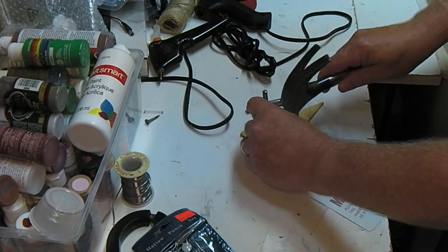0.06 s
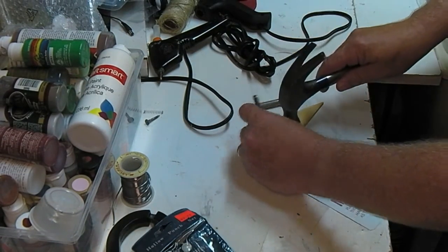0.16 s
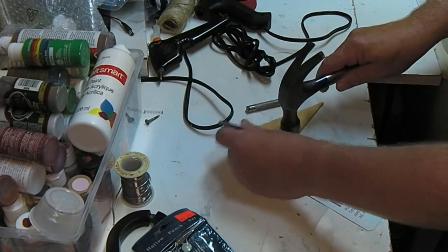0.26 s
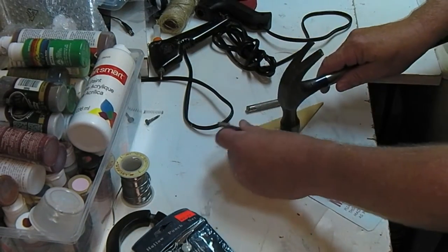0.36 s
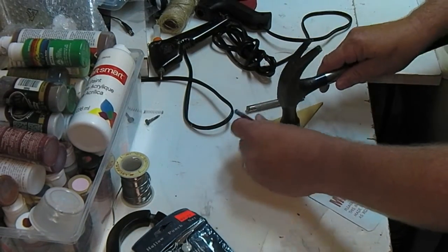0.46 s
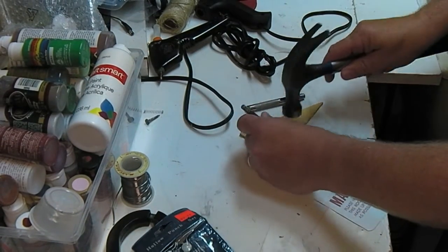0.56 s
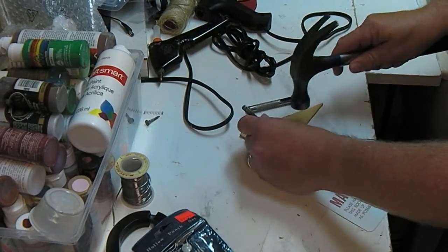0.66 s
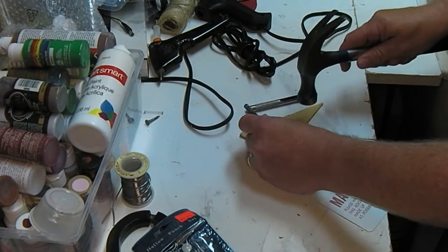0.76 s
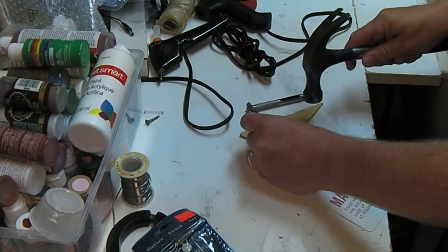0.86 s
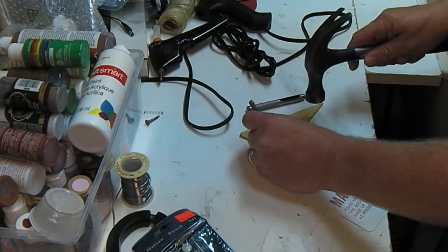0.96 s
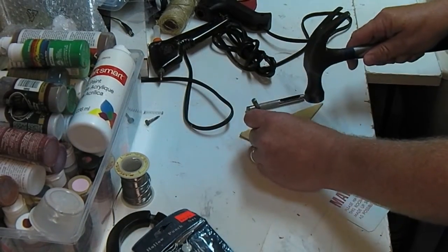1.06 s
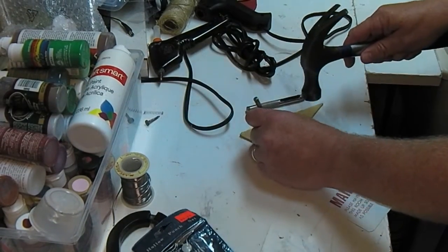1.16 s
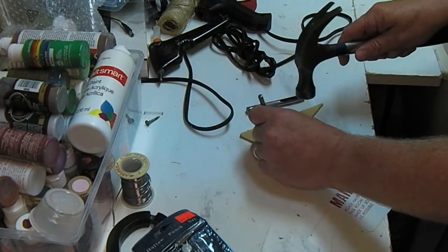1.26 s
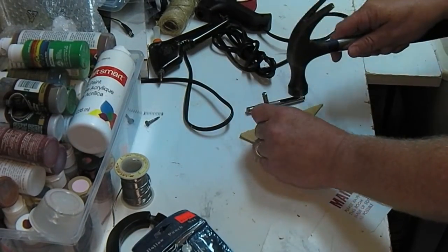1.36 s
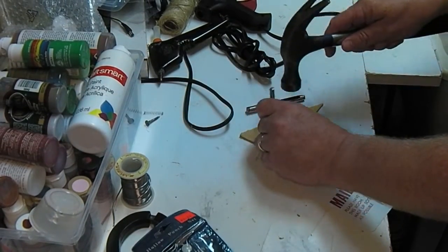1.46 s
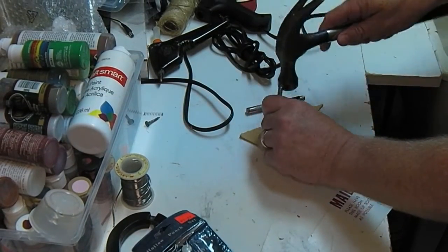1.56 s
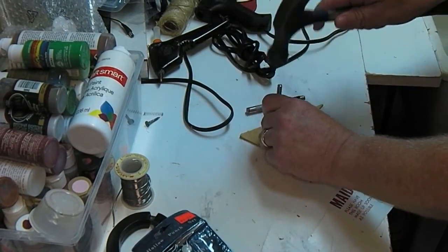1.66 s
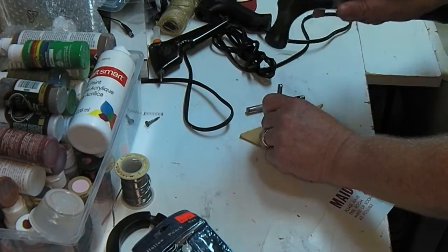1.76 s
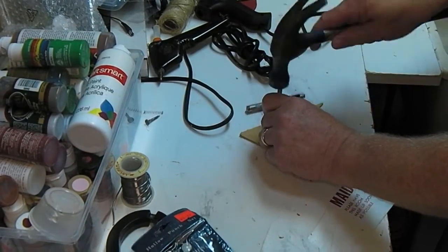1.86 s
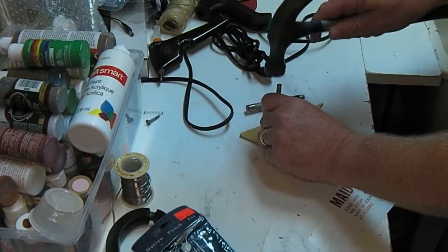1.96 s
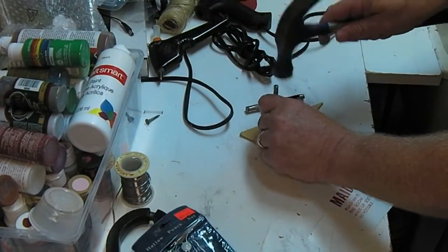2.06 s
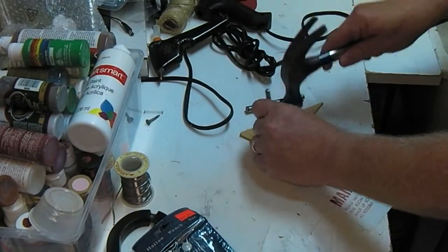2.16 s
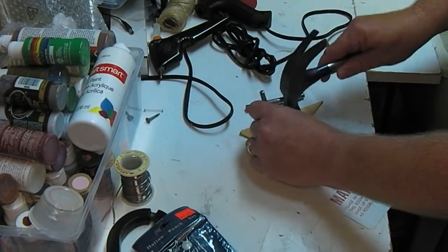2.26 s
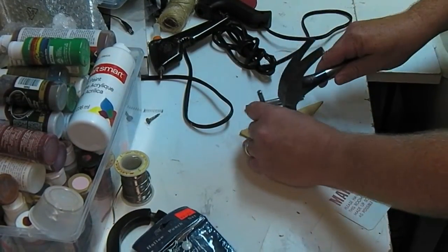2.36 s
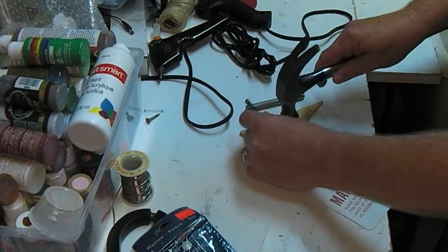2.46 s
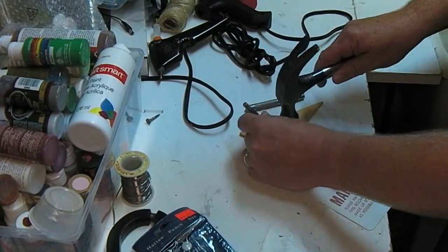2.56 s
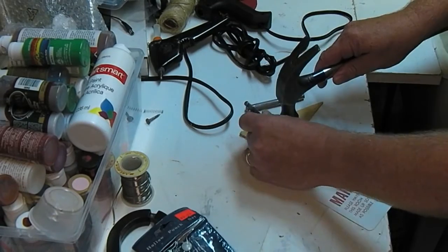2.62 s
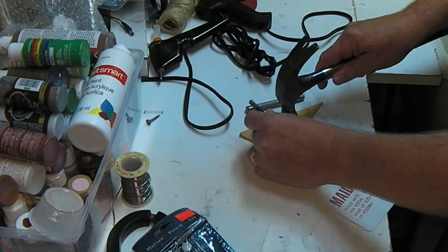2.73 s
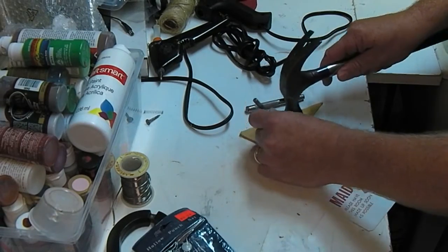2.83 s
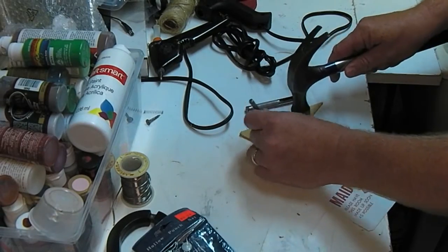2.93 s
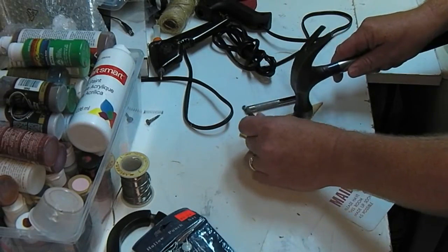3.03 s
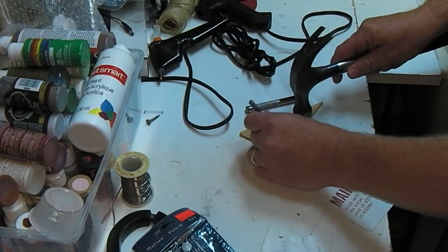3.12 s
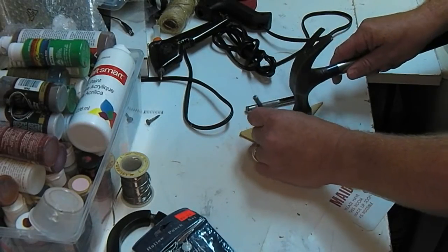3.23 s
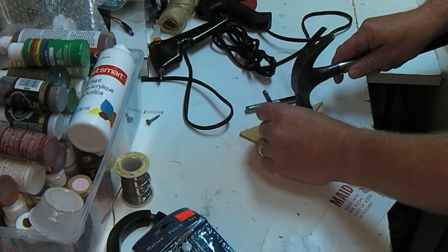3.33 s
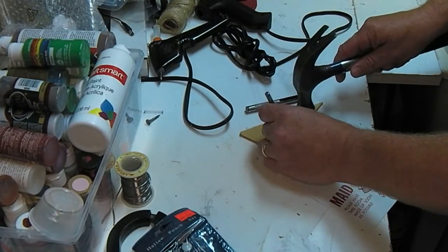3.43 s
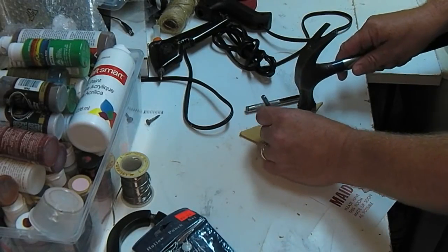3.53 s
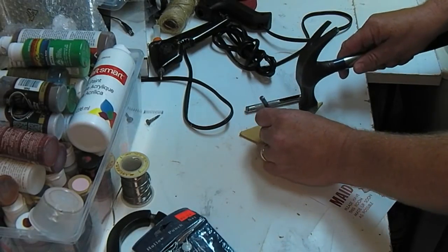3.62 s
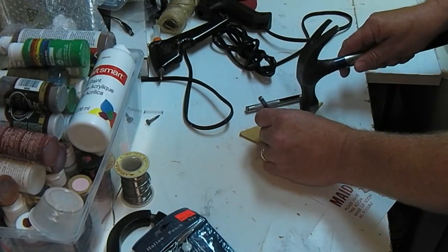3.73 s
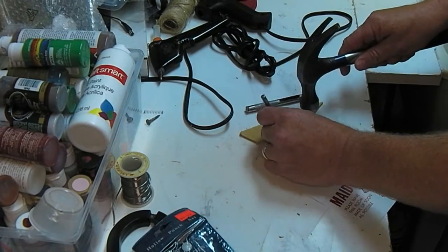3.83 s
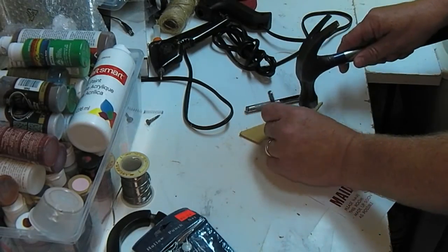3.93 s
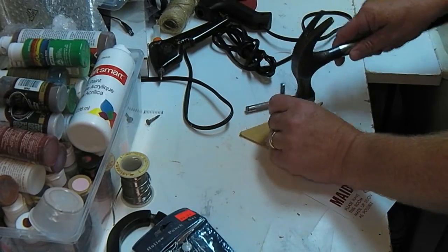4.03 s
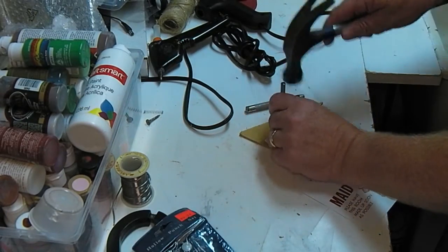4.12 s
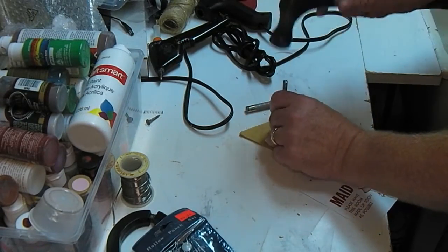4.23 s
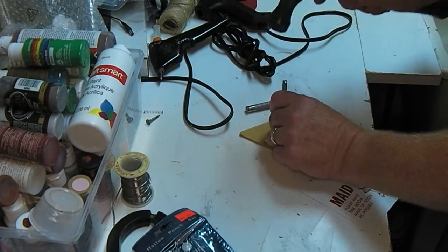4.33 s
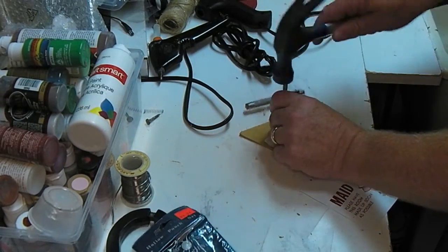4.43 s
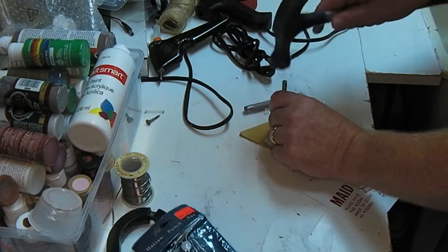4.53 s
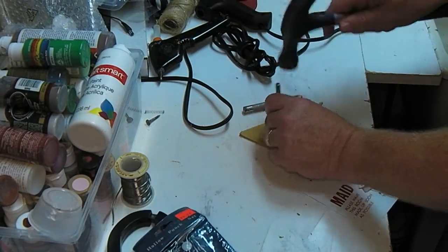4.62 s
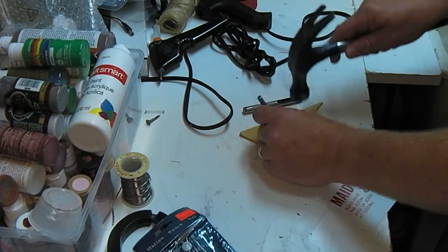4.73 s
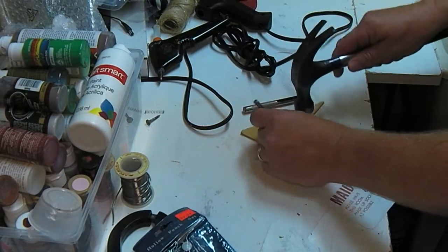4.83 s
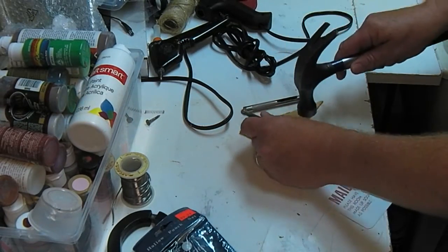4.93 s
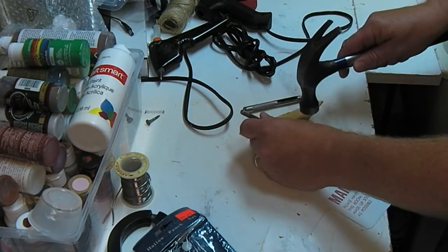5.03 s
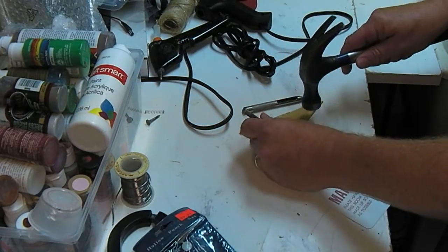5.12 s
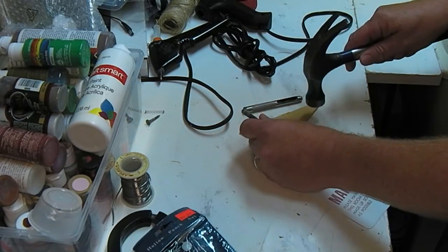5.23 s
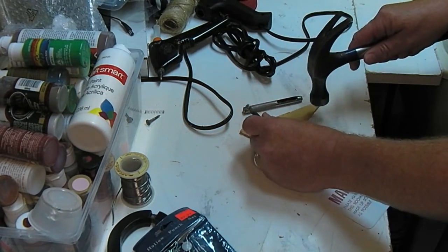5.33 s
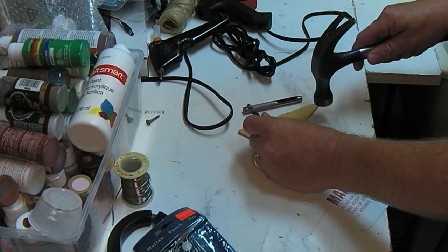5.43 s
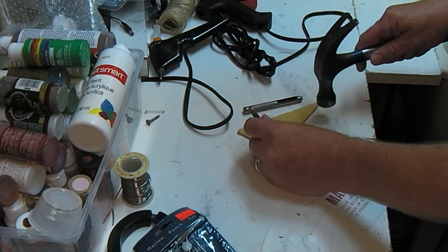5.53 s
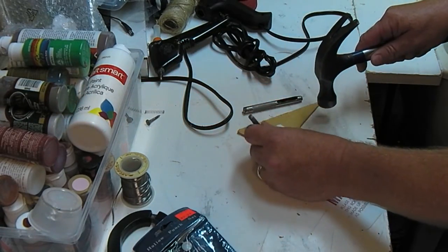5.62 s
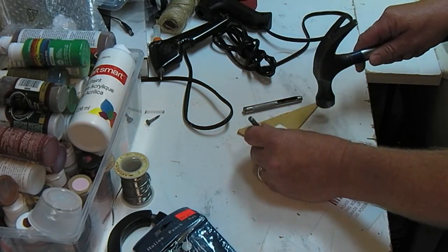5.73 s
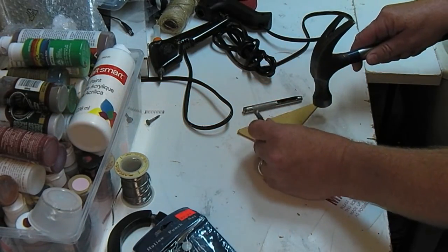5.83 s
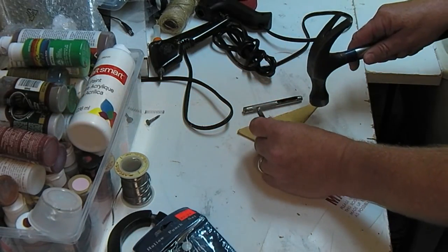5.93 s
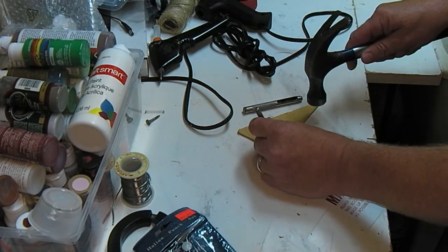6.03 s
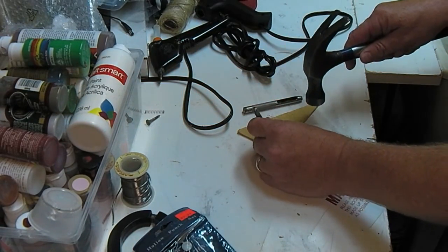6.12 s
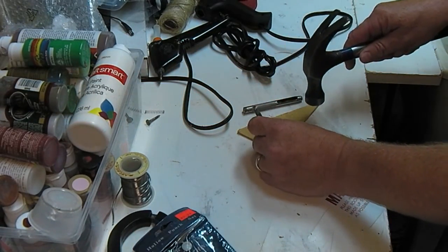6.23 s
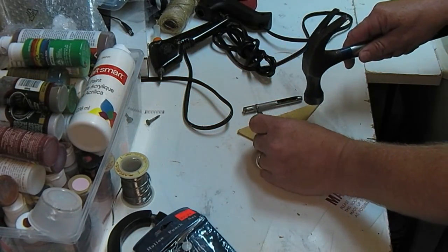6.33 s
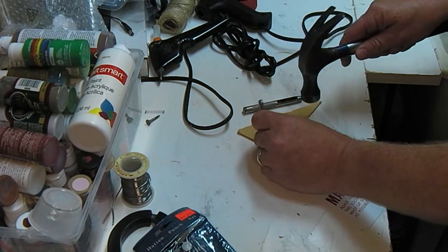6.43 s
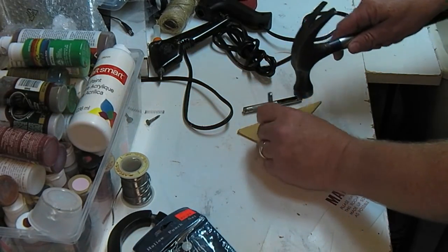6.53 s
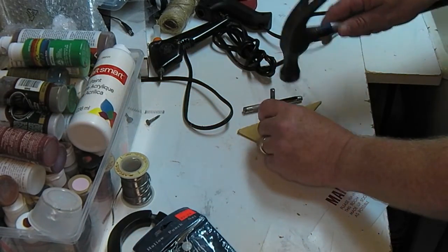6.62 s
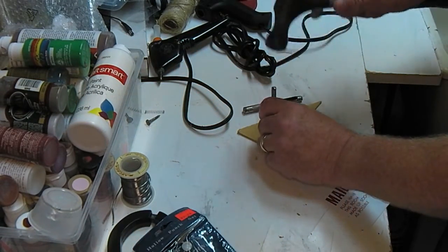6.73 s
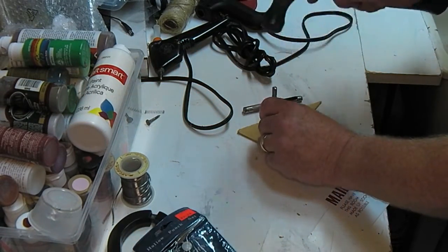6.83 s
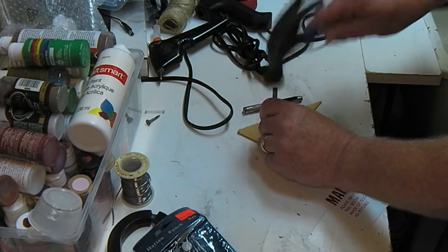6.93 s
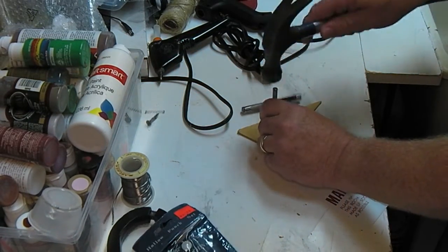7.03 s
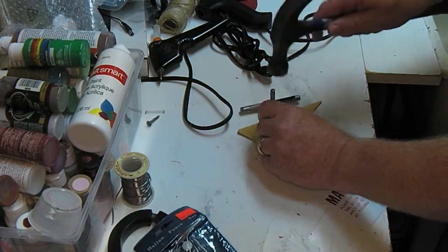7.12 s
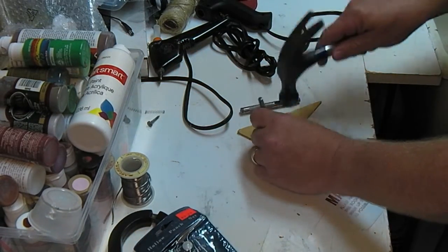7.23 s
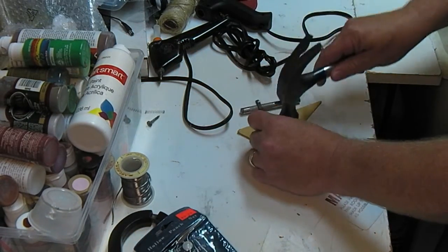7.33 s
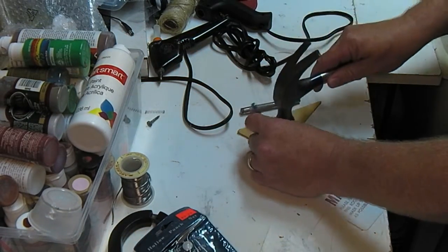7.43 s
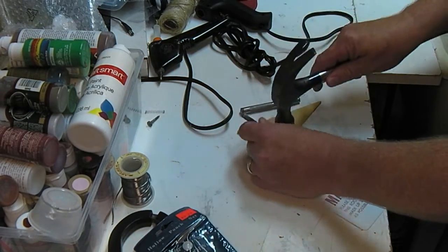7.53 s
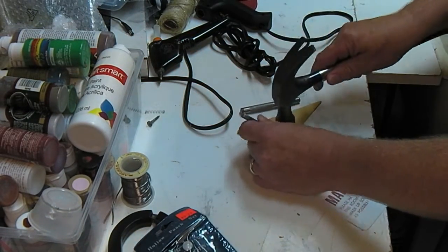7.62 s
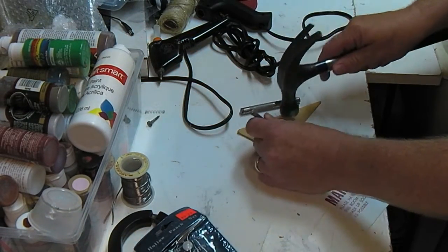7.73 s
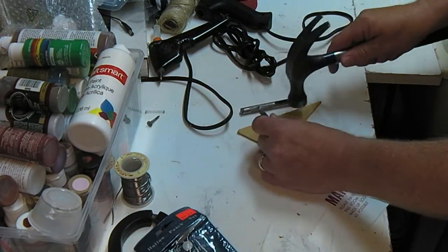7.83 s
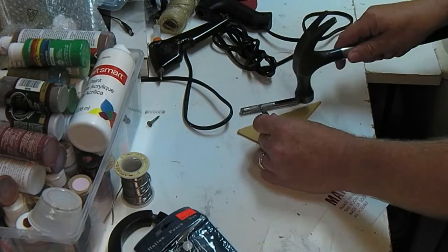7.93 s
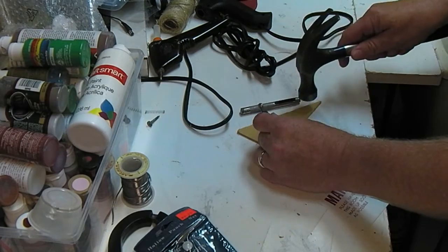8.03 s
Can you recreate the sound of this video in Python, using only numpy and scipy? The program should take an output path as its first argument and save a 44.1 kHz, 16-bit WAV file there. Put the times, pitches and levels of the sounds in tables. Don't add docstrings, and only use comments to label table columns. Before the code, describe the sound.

In a small workshop with a humming fan, a hammer cracks a steel punch three times, bench booming, loose things buzzing, plastic sheet snapping between.

```python
import sys
import numpy as np
from scipy import signal
from scipy.fft import rfft, irfft, next_fast_len
from scipy.io import wavfile
from scipy.ndimage import uniform_filter1d

SR = 44100
rng = np.random.default_rng(int(sys.argv[2]) if len(sys.argv) > 2 else 0)


def store_wav(level_fs):
    pcm = np.round(np.clip(np.atleast_2d(level_fs), -1, 1) * 32767)
    wavfile.write(sys.argv[1], SR, pcm.T.astype(np.int16))


def field_ratio(decibels):
    return 10 ** (np.asarray(decibels, dtype=float) / 20)


N = 356057

# start in seconds, strength in dB, steel crack in dB, bench boom in dB,
# slowness of the boom as a factor.
BLOWS = [
    (1.8868, 7.5, -0.5, 2, 1.4),
    (4.427, -22, 2.5, 3, 0.87),
    (4.4475, 13, -8, -2, 1.35),
    (6.9641, 10, -0.5, 3.5, 1.3),
]
# frequency in Hz, level in dB, t60 in seconds.
STEEL_MODES = [(3722, -4, 0.11), (6515, -1.5, 0.1), (10050, -1.5, 0.04), (5130, -12, 0.072),
               (13160, -5.5, .05)]
# centre in Hz, level in dB, rise in seconds, t60 in seconds.
BOOM_BANDS = [(38, -14, 0.0084, 0.13), (102.3, -12.5, 0.022, 0.22), (196.6, -7, 0.0083, 0.14),
              (427, -1, 0.011, 0.12), (800, -9, 0.016, 0.21), (1527, -4.5, 0.0087, 0.19),
              (2820, -7.5, 0.013, 0.2), (4230, -14, .003, 0.21), (8200, -15, 0.0023, 0.2),
              (13000, -21, 0.0053, 0.1003)]
# centre in Hz, level in dB, rise in seconds, t60 in seconds.
SWAY_BANDS = [(45, -19.5, .03, .7), (70, -3, 0.019, 1), (113, 0.5, 0.033, 1), (181.4, 6, .02, 0.33)]
# frequency in Hz, likeness 0-1.
BOOM_ALIKE = [(40, 1), (150, 0.99), (400, 1), (1500, 0.92), (4000, 0.1)]
# frequency in Hz, level in dB, t60 in seconds.
THUD_MODES = [(156.5, -6, 0.2), (215.7, -7.5, 0.27), (339.6, -6.5, .25), (385.5, -0.5, 0.26),
              (438, -6, 0.27), (472, -0.5, .26), (550.6, -8, .2)]
# frequency in Hz, level in dB, t60 in seconds.
BENCH_MODES = [(159, -12, 0.052), (211, -12, 0.27), (358.7, -1.5, 0.42), (414.8, 3.5, 0.1),
               (472.5, -4.5, 0.061), (576, -0.5, .08), (621, -15.5, 0.087), (730, -2.5, 0.1),
               (778, -8, .06), (970, -9, 0.11), (1100, 2.5, 0.043)]

# start in seconds, peak in dB, brightness in dB.
HOPS = [(.123, -28.5, 0), (1.955, -18.5, 5), (1.989, -4.5, 8), (2.042, -8, 1), (2.046, -6, -7),
        (2.08, -3.5, 0.5), (2.107, -9.5, -0.5), (2.127, -9.5, 2), (2.18, -14.5, 4.5), (2.402, -15, -4),
        (2.434, -14, -6), (2.448, -15, -6), (4.518, -14.5, -0.5), (4.554, -20, -1), (4.576, 4.5, -3),
        (4.585, -7, 0), (4.612, -10, -2), (4.644, 3, -4), (4.65, -6, 3), (4.693, 2.5, 9.5),
        (4.727, -6.5, 9.5), (4.746, -9, 19), (7.093, 2.5, 0), (7.151, -12, 8.5), (7.157, 1.5, 3),
        (7.202, -6.5, 4), (7.207, -6.5, 3), (7.239, -4, -3.5), (7.262, -7.5, 1), (7.304, -17.5, -0.5)]
# frequency in Hz, level in dB, t60 in seconds.
JARS = [(645.5, -13.5, 0.039), (996, -5, 0.021), (1656, -0.5, 0.026), (2320, -0.5, 0.023),
        (2780, -5.5, 0.018), (4490, 0, 0.0047)]
# frequency in Hz, level in dB, t60 in seconds.
LIDS = [(4690, -3, 0.01), (6540, 4.5, 0.02), (7380, -3.5, 0.0063), (9560, -4, 0.0084), (14600, 0, 0.007)]
# start in seconds, peak
# in dB, frequency in Hz, t60 in seconds.
THIN_TONES = [
    (0, -47, 4307, 1.5),
    (.113, -48, 6500, .1),
    (2.464, -40, 4400, .3),
    (2.511, -25, 4700, .03),
    (4.426, -26, 5050, .3),
]
# start in seconds, lying mode in dB,
# free first, second and third mode in dB.
BAR_RINGS = [
    (2.04, -54, -60, -60, -36.5),
    (4.57, -30, -50, -44, -34),
    (4.691, -55.5, -23.5, -46, -39),
    (4.768, -59, -34.5, -43, -59),
    (7.07, -23, -51, -36, -54),
    (7.157, -38, -44, -44, -32),
    (7.26, -55, -44, -54, -33),
    (7.31, -68.5, -52, -55, -54),
]
# frequency in Hz, level in dB, t60 in seconds.
BAR_PAIRS = [
    [(4306, 0, .35), (4270, -16, .2)],
    [(4399, 0, .5), (4403, -3, .6)],
    [(8721, 0, .3), (8705, -3, .3)],
    [(11800, 0.5, .2), (11860, -8.5, .12)],
]
# start in seconds, chatter level in dB, duration in seconds, brightness in dB.
SHAKES = [
    (0.125, -41.5, 0.018, -16),
    (1.893, -14, 0.28, -8.5),
    (2.397, -28, 0.089, -19.5),
    (4.448, -14.5, 0.34, -6),
    (6.992, -13.5, 0.31, -5.5),
    (7.437, -41, 0.0077, -10.5),
]

# start in seconds, peak in dB, thump in Hz, bench ring in dB.
RESTS = [
    (0.123, -16.5, 149, -9),
    (2.395, -9, 141, -5.5),
    (4.439, -14.5, 150, -18),
    (7.445, -17.5, 136.2, -12),
]
# start in seconds, peak in dB, t60 in seconds.
SNAPS = [
    (0.235, -27.5, 0.08),
    (0.2473, -30, 0.039),
    (0.2614, -15, 0.067),
    (0.2659, -12.5, 0.058),
    (2.3754, -35, 0.042),
    (2.5098, -9.5, 0.034),
    (2.5264, -30.5, 0.08),
    (2.8294, -39, 0.08),
    (6.6394, -41.5, 0.08),
]
# frequency in Hz, density in dB per Hz.
SNAP_COLOUR = [(590, -44), (1000, -21), (1610, -7), (3150, -13), (5830, -1), (7880, -4.5), (12100, -6),
               (16000, -7.5)]

# centre in Hz, level against direct in dB, t60 in seconds.
ROOM_BANDS = [(144.8, -6, 0.14), (556, -3.5, 0.28), (2540, -11.5, 0.4), (9000, 1.5, 0.17)]
# frequency in Hz, likeness 0-1.
ROOM_ALIKE = [(60, 0.95), (700, 1), (1500, 0.94), (3000, 0), (7000, 0.36), (14000, 0.6)]
# frequency in Hz, density in dB per Hz.
FAN_COLOUR = [(13, -83.5), (22, -36.5), (144, -5), (201, -11.5), (237, -5), (304, -10), (368, -5),
              (605, -6.5), (1280, -14.5), (1640, -6), (1780, -10), (6160, -19.5), (7690, -21), (14900, -28),
              (16200, -34.5)]
# centre in Hz, width in Hz, level in dB.
FAN_PEAKS = [(114, 28, -4.5), (237.6, 3.7, 8), (366, 29.5, 5), (470.4, 64, -1.5), (690, 5.4, 8),
             (1011, 87, 5), (1179, 83, 4), (1443, 35, 5), (1600, 13, 8), (3890, 390, -3.5)]
# frequency in Hz, likeness 0-1.
FAN_ALIKE = [(60, 0.9), (150, 0.6), (300, 0.91), (1400, 0.91), (3000, 0), (7000, 0.25), (14000, 0.2)]
# frequency in Hz, left minus right in dB.
LEAN = [(60, -1), (110, -1.0), (200, -0.5), (380, -2.5), (700, -2.5), (1290, -2.5), (2380, -2), (4400, 2.5),
        (8120, 0), (15000, 0.5)]

FAN_DB = -43
NOTCH_HZ, NOTCH_Q = 7900, 12
PORT_LAG_S, DIRECT_LAG_S = 7e-5, 4e-5
SAG_DB_PER_S, SETTLE_DB_PER_S = 38, 262.5
BUZZ_DB, BUZZ_T60_S = -10, 0.075
RIM_DB = -6.5
KNOCK_DB, KNOCK_SHARE = -21.5, 0.2
BIGGEST_TICK = 2.5
DULL_DB_PER_S, DULLS_DB = 58, 14
THUD_DB, THUD_GROWTH = -9, 1.17


def blows():
    out = np.zeros((2, N))
    for s, db, steel_db, boom_db, slowness in BLOWS:
        boom = field_ratio(db + boom_db) * roar(BOOM_BANDS, slowness)
        sway = field_ratio(db - 39.5) * roar(SWAY_BANDS, 0.56)
        add(out, s, boom + sway)
        thud = ring(THUD_MODES, .006, 2.8, .4, contact=0.014 * slowness)
        add(out, s, field_ratio(THUD_GROWTH * db + boom_db + THUD_DB) * thud)
        for slip in np.sort(rng.uniform(0, 0.018, size=16)):
            force = field_ratio(db + steel_db - 8) * min(slip / 0.0049, 1) ** 2
            add(out, s + slip, force * ring(STEEL_MODES, .04, 5.9, 0.14))
    return out


def roar(bands, slowness):
    t = np.arange(49152) / SR
    hz, shake = ports(len(t), BOOM_ALIKE)
    out = 0
    for centre, db, rise, t60 in bands:
        band = irfft(shake * octave(hz, centre, 0.37))
        build = (1 - np.exp(-t / max(rise * slowness, 1e-4))) ** 2
        out = out + field_ratio(db) * band / band.std() * build * fade(t, t60)
    return out


def ring(modes, detune, scatter_db, seconds, contact=0.00075):
    hz, db, t60 = np.transpose(modes)[:, :, None]
    weight, shift, phase = rng.standard_normal((3, len(modes), 1))
    t = np.arange(int(seconds * SR)) / SR
    waves = np.sin(2 * np.pi * hz * (1 + detune * shift) * t + phase)
    y = np.sum(field_ratio(db + scatter_db * weight) * fade(t, t60) * waves, axis=0)
    y = y * np.sin(np.pi / 2 * np.minimum(t / contact, 1)) ** 2
    return y / np.abs(y).max()


def landings():
    out = np.zeros(N)
    for s, db, bright_db in HOPS:
        knock = ring(BENCH_MODES, 0.043, 3.3, 0.28, contact=0.0013)
        add(out, s, field_ratio(KNOCK_DB + KNOCK_SHARE * db + 5.5) * knock)
        rocks = np.cumsum(rng.uniform(.002, 0.0054, size=3)) * [0, 1, 1]
        for late, rock_db in zip(rocks, [0, -8, -11]):
            jar = ring(spread(JARS, count=24), 0.042, 2.1, .08, contact=.0006)
            add(out, s + late, field_ratio(db + rock_db - 5) * jar)
            rim = ring(spread(LIDS, count=20), 0.027, 3.7, .04)
            add(out, s + late, field_ratio(db + rock_db + brightness(s) + bright_db + RIM_DB) * rim)
    return out


def bar_and_grazes():
    out = np.zeros(N)
    for s, db, hz, t60 in THIN_TONES:
        add(out, s, field_ratio(db) * ring([(hz, 0, t60)], .001, 1, .1, contact=.001))
    for s, *mode_db in BAR_RINGS:
        for pair, db in zip(BAR_PAIRS, mode_db):
            add(out, s, field_ratio(db) * ring(pair, .0001, 1.4, .6, contact=0.011))
    return out


def chatter():
    t, gain = np.arange(N) / SR, np.zeros(N)
    jars = clatter(spread(JARS, count=60), 100, 3.7)
    lids = clatter(spread(LIDS, count=50), 149.4, 4.7)
    for s, db, lasts, _ in SHAKES:
        settled = np.maximum(t[:SR] - lasts, 0)
        add(gain, s, field_ratio(db - SAG_DB_PER_S * t[:SR] - SETTLE_DB_PER_S * settled))
    for s, db, _ in HOPS:
        add(gain, s, field_ratio(db + BUZZ_DB) * fade(t[:SR // 4], BUZZ_T60_S))
    return gain * (jars + field_ratio(brightness(t)) * lids)


def clatter(modes, per_second, spread_db):
    out, count = 0, 2 ** 16
    for hz, db, t60 in modes:
        ticks = np.zeros(count)
        at = rng.integers(count, size=int(per_second * count / SR))
        size = np.minimum(rng.exponential(size=len(at)), BIGGEST_TICK)
        ticks[at] = field_ratio(spread_db * size) * rng.choice([-1, 1], size=len(at))
        r, turn = fade(1 / SR, t60), 2 * np.pi * hz / SR
        rung = signal.lfilter([1, 2, 1], [1, -2 * r * np.cos(turn), r ** 2], ticks)
        out = out + field_ratio(db) * np.sin(turn) * rung
    return np.resize(out / out.std(), N)


def brightness(t):
    starts, _, _, bright_db = np.transpose(SHAKES)
    last = np.maximum(np.searchsorted(starts, t + .02) - 1, 0)
    return bright_db[last] - np.minimum(DULL_DB_PER_S * (t - starts[last]), DULLS_DB)


def spread(body, count):
    hz, db, t60 = np.transpose(body)
    at = np.geomspace(hz[0], hz[-1], count) * (1 + 0.061 * rng.standard_normal(count))
    return np.transpose([at, np.interp(at, hz, db), np.interp(at, hz, t60)])


def rests():
    out, t = np.zeros((2, N)), np.arange(2048) / SR
    for s, db, hz, ring_db in RESTS:
        thump = np.sin(2 * np.pi * hz * t) * np.exp(-((t * hz - .85) / 0.51) ** 2)
        add(out, s + 0.0024, -field_ratio(db) * thump)
        add(out, s + 0.012, field_ratio(db + ring_db) * ring(BENCH_MODES, 0.012, 3, .4, contact=0.0072))
        add(out, s, field_ratio(db - 30.5) * roar(SWAY_BANDS, 0.55))
    return out


def snaps():
    out, t = np.zeros(N), np.arange(4096) / SR
    colour = field_ratio(read(SNAP_COLOUR, np.fft.rfftfreq(len(t), 1 / SR)))
    for s, db, t60 in SNAPS:
        uneven = rng.standard_normal(len(t)) * field_ratio(1.4 * rng.exponential(size=len(t)))
        grains = irfft(rfft(uneven) * colour)
        add(out, s, field_ratio(db - 6) * grains / grains.std() * fade(t, t60) * np.minimum(t / 0.0017, 1))
    return out


def room(x):
    t = np.arange(16384) / SR
    hz, air = ports(len(t), ROOM_ALIKE)
    tail = 0
    for centre, db, t60 in ROOM_BANDS:
        band = irfft(air * octave(hz, centre, 0.79)) * fade(t, t60) * np.minimum(t / 0.0023, 1)
        tail = tail + field_ratio(db) * band / np.sqrt(np.sum(fade(t, t60) ** 2))
    lag = np.array([[0], [DIRECT_LAG_S * SR]])
    direct = np.sinc(t * SR - 8 - lag) * (t * SR < 20)
    return signal.fftconvolve(x, direct + tail, axes=1)[:, 8:N + 8]


def fan():
    count = next_fast_len(N)
    hz, air = ports(count, FAN_ALIKE)
    air = air * field_ratio(read(FAN_COLOUR, hz))
    out = irfft(air, count)
    for centre, width, db in FAN_PEAKS:
        steps = np.repeat(rng.standard_normal(count // 8192 + 1), 8192)
        swell = uniform_filter1d(steps, size=8192)[:count]
        resonance = irfft(air / (1 + ((hz - centre) / width * 2) ** 2), count)
        out = out + field_ratio(db + 1.8 * swell) * resonance
    return field_ratio(FAN_DB) * out[:, :N] / out.std()


def ports(count, alike):
    hz = np.fft.rfftfreq(count, 1 / SR)
    shared, own = rfft(rng.standard_normal((2, count)))
    c = np.clip(read(alike, hz), 0, 1)
    late = shared * np.exp(-2j * np.pi * hz * PORT_LAG_S)
    return hz, np.array([shared, c * late + np.sqrt(1 - c ** 2) * own])


def read(table, hz):
    at, value = np.transpose(table)
    return np.interp(np.log(hz + 1), np.log(at), value)


def octave(hz, centre, width):
    return np.exp(-.5 * (np.log2((hz + 1) / centre) / width) ** 2)


def fade(t, t60):
    return np.exp(-np.log(1000) * t / np.maximum(t60, .002))


def add(out, s, x):
    i = int(s * SR)
    out[..., i:i + x.shape[-1]] += x[..., :N - i]


def scene():
    hops = landings() + bar_and_grazes()
    return room(blows() + hops + chatter() + rests() + snaps()) + fan()


def top_cut(x):
    return signal.sosfilt(signal.butter(12, 16360, fs=SR, output="sos"), x)


def record(dry):
    count = next_fast_len(N)
    lean_db = read(LEAN, np.fft.rfftfreq(count, 1 / SR))
    x = irfft(rfft(dry, count) * field_ratio(np.array([lean_db, -lean_db]) / 2), count)[:, :N]
    x = x - 0.62 * signal.lfilter(*signal.iirpeak(NOTCH_HZ, NOTCH_Q, SR), x)
    x = signal.lfilter(*signal.butter(2, 45, "high", fs=SR), x)
    keep = np.exp(-1 / (.6 * SR))
    load = signal.lfilter([1 - keep], [1, -keep], np.minimum(np.abs(x).mean(axis=0), 1))
    x = x * field_ratio(-4.0 * np.tanh(load / 0.1))
    return top_cut(np.clip(x, -.97, .97))


dry = scene()
out = record(dry)
store_wav(out)
```